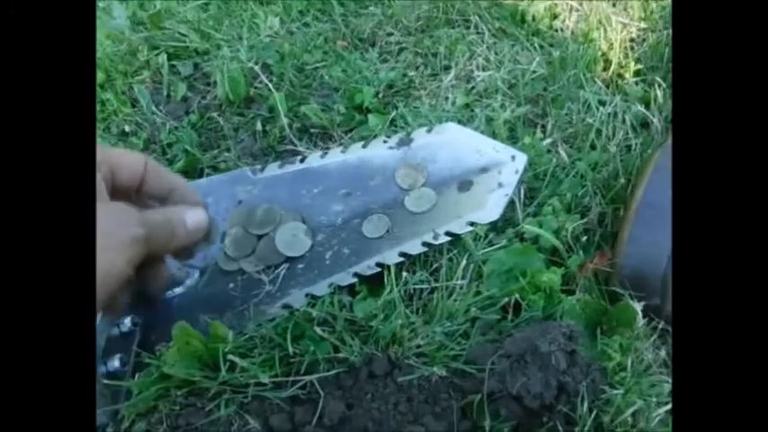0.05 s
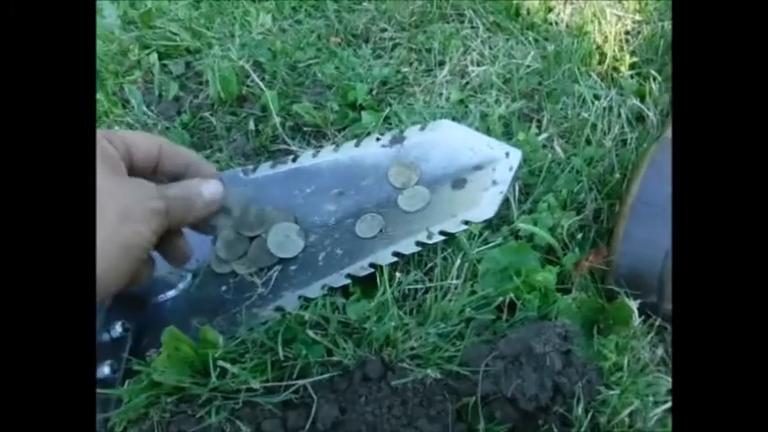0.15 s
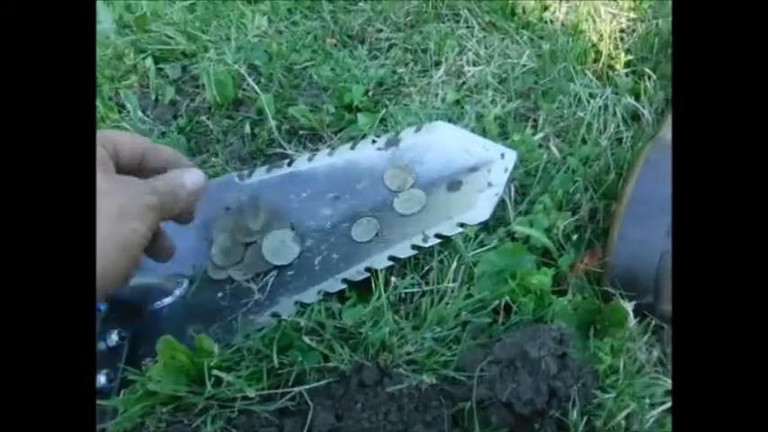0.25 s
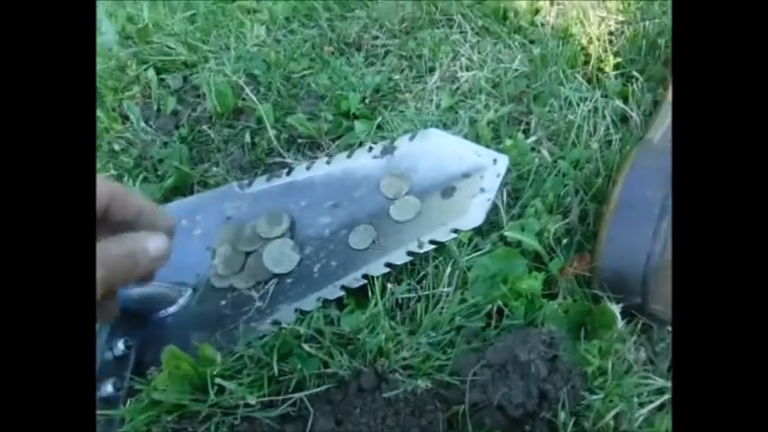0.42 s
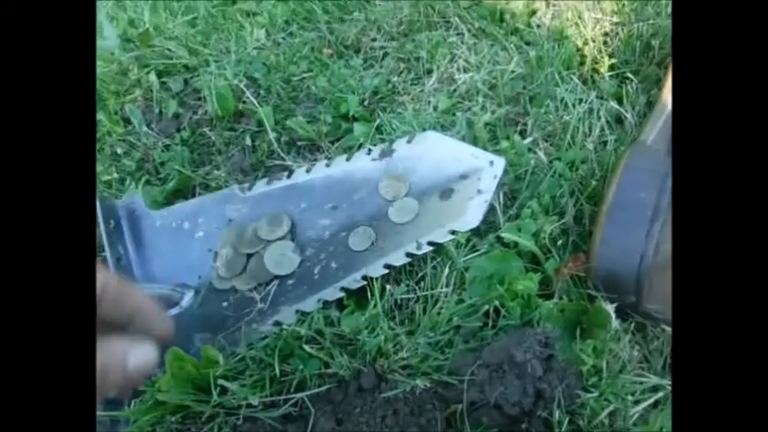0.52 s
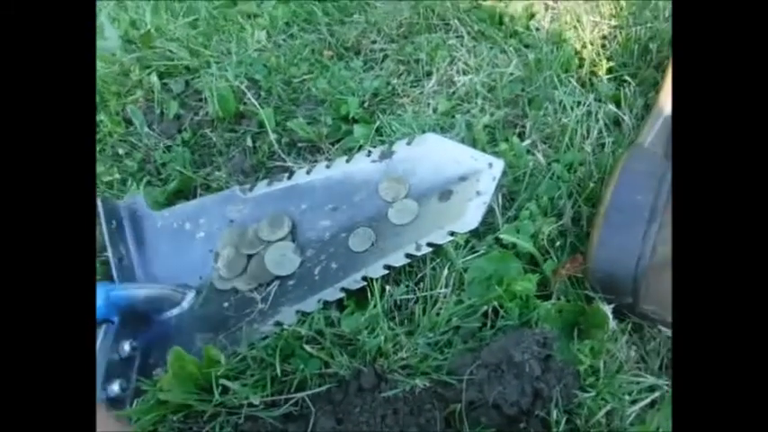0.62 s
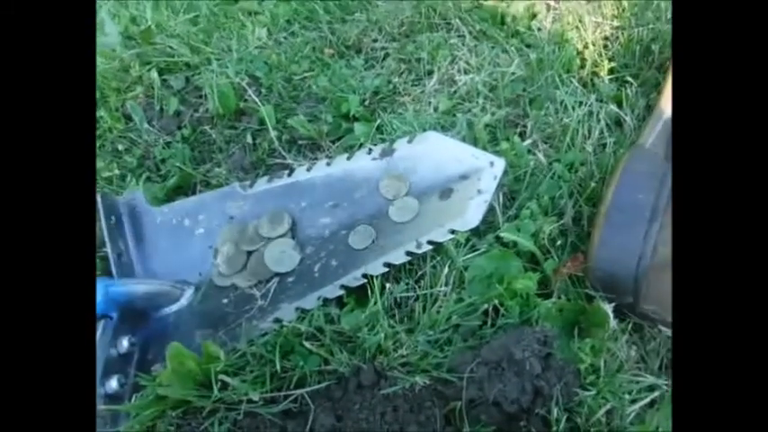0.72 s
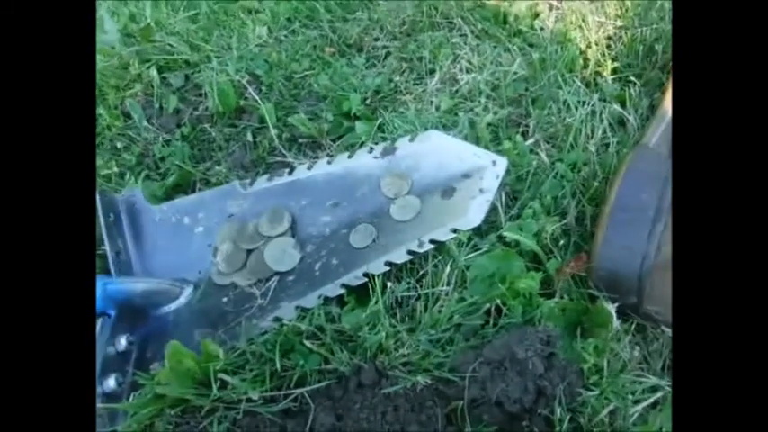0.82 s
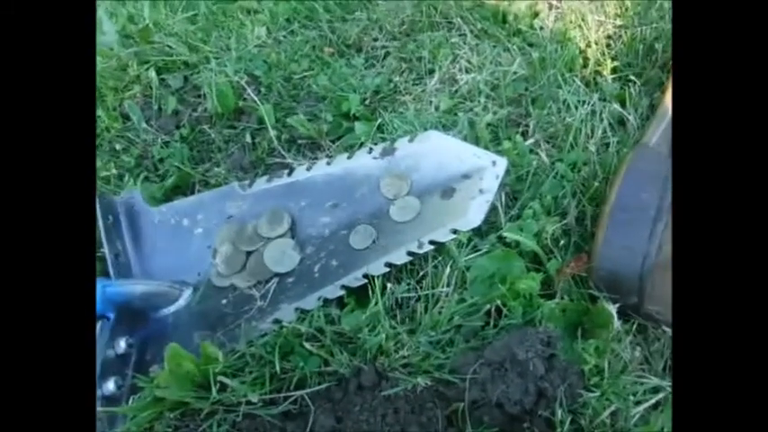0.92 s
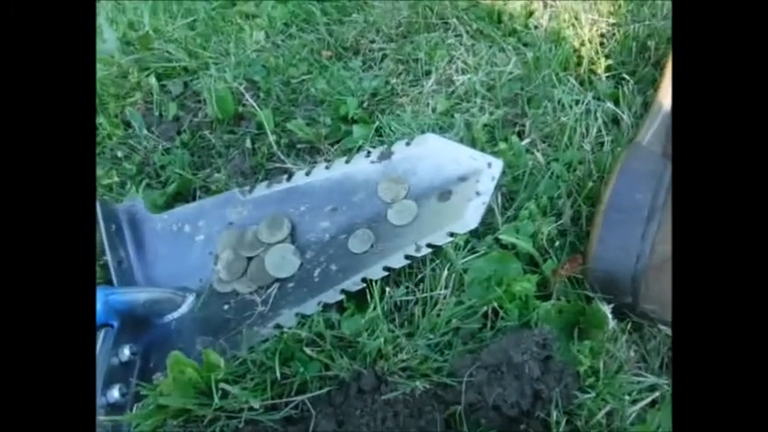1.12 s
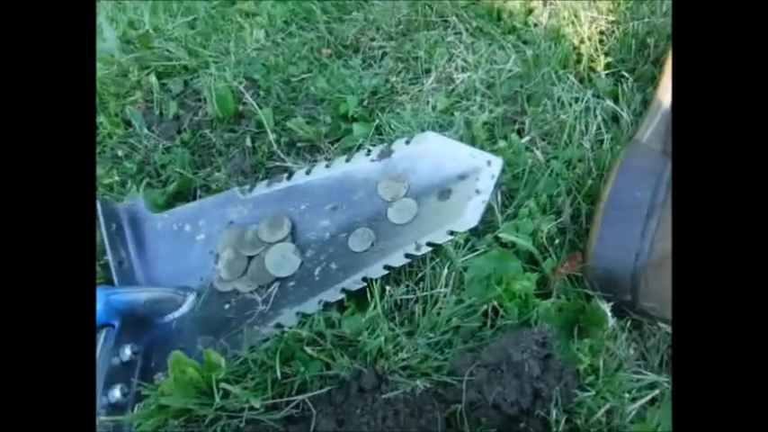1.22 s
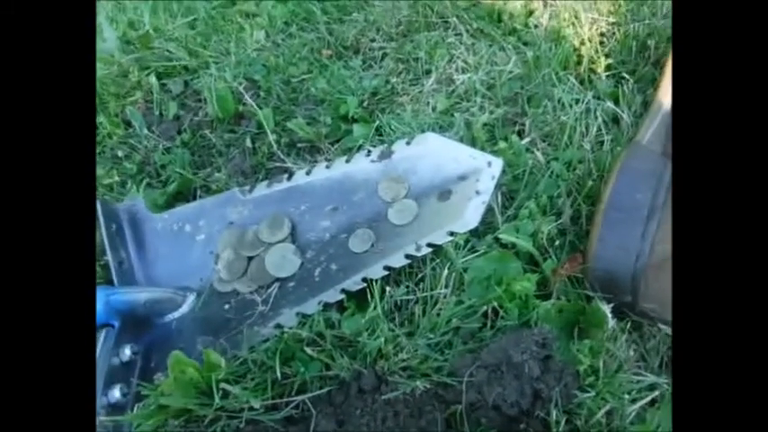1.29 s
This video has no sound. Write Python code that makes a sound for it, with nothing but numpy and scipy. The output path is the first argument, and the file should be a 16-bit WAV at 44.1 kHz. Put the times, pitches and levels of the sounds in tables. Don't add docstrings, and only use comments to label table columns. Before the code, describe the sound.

Two quick, bright clanks of coins landing on a metal blade outdoors, then quiet birdsong and distant traffic

```python
import sys
import numpy as np
from scipy import signal
from scipy.fft import rfft, irfft
from scipy.io import wavfile
from scipy.ndimage import uniform_filter1d

SR = 44100
rng = np.random.default_rng(int(sys.argv[2]) if len(sys.argv) > 2 else 0)


def wav_record(signal):
    frames = np.transpose(np.atleast_2d(signal))
    bounded = np.clip(frames, -1, 1)
    quanta = np.round(bounded * 32767).astype(np.int16)
    wavfile.write(sys.argv[1], SR, quanta)


def makeup_ratio(level_db):
    decades = np.asarray(level_db, float) / 20
    return 10 ** decades


N = 59535

FIRST_PITCHES = [1058, 1780, 3052, 3632, 4290, 4670, 4955, 5142, 5534, 5844, 8610, 8987, 9860, 10858]
BOUNCE_PITCHES = [1790, 3039, 3642, 4164, 4305, 4692, 5150, 5970, 8632]
SECOND_PITCHES = [980, 3060, 3583, 4140, 4685, 5128, 5240, 5715, 6264, 7106, 7960, 9755, 10309, 15400]
AFTER_PITCHES = [1055, 1717, 2093, 3402, 4313, 4856, 5290, 5650, 6000, 6621, 7540, 7873, 8050]
# (level [dB], time to fade by 60 dB [s])
FIRST_TONES = [(-21.5, 0.1), (-15, 0.033), (-10.5, 0.021), (-7.5, 0.034), (-2, 0.033), (0.5, 0.026),
               (-6.5, .06), (-1.5, 0.029), (-13, 0.05), (-1, 0.016), (-16, 0.14), (-7.5, 0.095),
               (-25.5, 0.046), (-23, .04)]
BOUNCE_TONES = [(-10, 0.044), (-8.5, .03), (-17.5, 0.077), (1.5, 0.028), (-18, 0.077), (-8, 0.028),
                (-10.5, 0.053), (-12, 0.027), (-8, 0.042)]
SECOND_TONES = [(-18.5, 0.037), (-10.5, 0.028), (-25, 0.023), (1.5, 0.036), (-32, 0.044), (-7, 0.061),
                (-9, 0.039), (-4.5, 0.031), (-1.5, 0.024), (-17, 0.025), (-14, 0.041), (-14, 0.049),
                (-24, .03), (-28, 0.043)]
AFTER_TONES = [(-29.5, 0.17), (-22, .12), (-27.5, 0.27), (-20, 0.17), (-32.5, 0.36), (-28, .25),
               (-34, 0.22), (-30, .25), (-25, 0.27), (-31, 0.16), (-35, .08), (-22, 0.18), (-19.5, 0.2)]
# (time [s], ring [dB], crack [dB], clatter [dB], brightness [dB per octave])
FIRST_HITS = [
    (0.241, -5, 6, -12.5, 8.5),
    (.2455, -22.5, -12, -25, -4.5),
    (0.2659, -30, -39, -48, 3),
]
BOUNCE_HITS = [
    (.2779, -17, -12, -41, -11),
    (.2882, -33.5, -21, -29, -2),
    (.3703, -25, -14, -28, 0),
    (.3270, -13, -15, -44, -11),
]
SECOND_HITS = [
    (0.3229, -53, -12, -45, -3),
    (0.3254, -43, 4.5, -32, 8),
    (0.3313, 4, -2, -5.5, 3.5),
    (0.34, -15.5, -12, -27, -4),
    (.3652, -39, -12, -42, 5),
    (.388, -41, -34, -48, 0),
]
# (frequency [Hz], level [dB])
CRACK_SPECTRUM = [(150, -31), (800, -16), (2400, -12.5), (4500, 3), (7000, -4), (10000, -4), (13000, -27.5),
                  (15500, -24)]
SINGING_PITCHES = [8856, 9314, 14620, 11680, 15400, 9120, 9321, 9082]
# (start [s], landing [s])
SINGING_TIMES = [(.2406, .293), (.2406, .33), (.2406, .27), (.2406, .27), (.2406, .25), (.3256, .331),
                 (.3312, .3648), (.3312, .63)]
# (level [dB], 60 dB fade in the air [s], 60 dB fade once landed [s])
SINGING_FADES = [(-17, 0.063, .1), (-34.5, 1.1, .1), (-37, 0.11, 0.1), (-26, 0.088, 0.11), (-23, .06, .06),
                 (-13, .1, .02), (-10, 1.4, 0.097), (-24.5, 0.45, .1)]
# (time [s], level [dB], pitch [Hz], 60 dB fade [s])
THUDS = [
    (0.336, -43, 92, 0.05),
    (1.183, -38, 81.4, 0.065),
]
# (time [s], level [dB])
SNAP = (1.295, -39)
# (start [s], length [s], first pitch [Hz], last pitch [Hz], level [dB])
CHIPS = [(.504, 0.017, 6700, 3800, -44), (.622, 0.022, 6200, 4330, -44), (.625, 0.038, 2950, 2960, -50),
         (.762, .010, 5980, 4600, -39.5), (.884, 0.0068, 6240, 5750, -56), (.916, 0.013, 6660, 5730, -49),
         (1.158, .009, 8360, 7140, -47.5), (1.178, .014, 6220, 5000, -50), (.005, 0.021, 2188, 2015, -48),
         (.04, 0.043, 2235, 2030, -53), (.035, 0.06, 3005, 2790, -52.5), (.075, .05, 5300, 4240, -52),
         (.826, 0.043, 3900, 4526, -42.5), (.830, .026, 4720, 5000, -43.5), (.672, .03, 4200, 4480, -43.5),
         (.682, 0.022, 4800, 4880, -45)]
CHIRRUPS = [
    (.698, 0.039, 4020, 3137, -44),
    (.852, .056, 4075, 2713, -43.5),
    (1.01, 0.032, 4600, 5170, -47.5),
    (1.06, 0.026, 5400, 4720, -45.5),
]
# (multiple of idling pitch [-], level [dB])
ENGINE_TONES = [(1, -77), (2, -59.5), (3, -62.5), (4, -61), (6, -66), (8, -70)]
# (time [s], level [dB])
ENGINE_LOAD = [(0, 0), (.3, 0.5), (.55, -3.5), (.8, 1), (1.05, 3), (1.35, 4.5)]
# (frequency [Hz], level [dB per Hz])
WASH_SPECTRUM = [(15, -42), (30, -20), (90, -3.5), (350, -13.5), (1500, -5), (2500, -9.5), (4400, -4.5),
                 (9000, -13), (15500, -23.5)]
# (time [s], length [s], lost above [Hz])
DROPOUTS = [(.538, .02, 7200), (.624, .014, 9300), (.804, .036, 9300), (.944, .016, 8500),
            (1.028, .018, 9300), (1.328, .018, 8800)]

WASH_DB = -47.5


def evened(x):
    return x / np.sqrt(np.mean(x ** 2) + 1e-20)


def read(points, hz):
    f, value = np.transpose(points)
    return np.interp(np.log(hz + 1), np.log(f + 1), value)


def add(mix, s, sound):
    part = mix[round(s * SR):][:len(sound)]
    part += sound[:len(part)]


def coloured(db_of_hz, size):
    spectrum = rfft(rng.standard_normal(size))
    hz = np.fft.rfftfreq(size, 1 / SR)
    return evened(irfft(spectrum * makeup_ratio(db_of_hz(hz)), size))


def wander(per_s, size):
    drift = rng.standard_normal(size + SR)
    for _ in range(2):
        drift = signal.lfilter([1], [1, -np.exp(-per_s / SR)], drift)
    return evened(drift[SR:])


def half_second():
    return np.arange(SR // 2) / SR


def ring(pitches, tones):
    t = half_second()
    db, t60 = np.transpose(tones)[:, :, None]
    turns = np.outer(pitches, t) + rng.random((len(pitches), 1))
    fade = makeup_ratio(db - 60 * t / np.clip(t60, .005, .4))
    rise = np.minimum(t / 0.00033, 1)
    return rise * (fade * np.sin(2 * np.pi * turns)).sum(0)


def impact_noise(tilt_db):
    def spectrum(hz):
        return read(CRACK_SPECTRUM, hz) + tilt_db * np.log2(np.maximum(hz, 2500) / 5000)
    return coloured(spectrum, size=SR // 2)


def contact(ringing, ring_db, crack_db, clatter_db, tilt_db):
    t = half_second()
    crack_t60, clatter_t60 = .004, 0.054
    crack = makeup_ratio(crack_db - 60 * t / crack_t60) * impact_noise(tilt_db)
    clatter = makeup_ratio(clatter_db - 60 * t / clatter_t60) * impact_noise(tilt_db - 3.5)
    rise = np.minimum(t / 0.00024, 1)
    return makeup_ratio(ring_db) * ringing + rise * (crack + clatter)


def landings():
    out = np.zeros(N)
    for pitches, tones, hits in [(FIRST_PITCHES, FIRST_TONES, FIRST_HITS),
                                 (BOUNCE_PITCHES, BOUNCE_TONES, BOUNCE_HITS),
                                 (SECOND_PITCHES, SECOND_TONES, SECOND_HITS)]:
        for s, *how in hits:
            add(out, s, contact(ring(pitches, tones), *how))
    loudest_s = SECOND_HITS[2][0]
    add(out, loudest_s, makeup_ratio(-5) * ring(AFTER_PITCHES, AFTER_TONES))
    return out


def singing():
    out, t = np.zeros(N), half_second()
    rise = 1 - np.exp(-t / 0.0042)
    landing_db = -2
    for hz, (s, lands), (db, t60, landed_t60) in zip(SINGING_PITCHES, SINGING_TIMES, SINGING_FADES):
        landed = np.maximum(t - (lands - s), 0)
        fade_db = -60 * (t - landed) / t60 - 60 * landed / landed_t60
        fade_db = fade_db + landing_db * np.minimum(landed / 0.0015, 1)
        add(out, s, rise * makeup_ratio(db + fade_db) * np.sin(2 * np.pi * hz * t))
    return out


def coins():
    bass_cut_hz = 760
    return signal.lfilter(*signal.butter(2, bass_cut_hz, "high", fs=SR), landings() + singing())


def ground():
    out, t = np.zeros(N), half_second()
    for s, db, hz, t60 in THUDS:
        add(out, s, makeup_ratio(db - 60 * t / t60) * np.sin(2 * np.pi * hz * t))
    snap_s, snap_db = SNAP
    noise = coloured(lambda hz: 5.4 * np.log2(hz + 50), size=len(t))
    add(out, snap_s, makeup_ratio(snap_db - 60 * t / .006) * noise)
    return out


def sparrows():
    out = np.zeros(N)
    buzz_hz, buzz_depth = 297.4, 0.8
    for notes, depth in [(CHIPS, 0), (CHIRRUPS, buzz_depth)]:
        for s, length, from_hz, to_hz, db in notes:
            t = np.arange(0, length, 1 / SR)
            turns = np.cumsum(from_hz + (to_hz - from_hz) * t / length) / SR
            buzz = depth * np.sin(2 * np.pi * buzz_hz * t)
            swell = np.sin(np.pi * t / length)
            add(out, s, makeup_ratio(db) * swell * np.sin(2 * np.pi * turns + buzz))
    hoarseness = evened(uniform_filter1d(rng.standard_normal(N), size=60))
    out = out * (1 + 0.56 * hoarseness)
    t = np.arange(SR // 4) / SR
    echo_db, echo_t60 = -4, .12
    echo = rng.standard_normal(len(t)) * makeup_ratio(-60 * t / echo_t60) * (t > .004)
    echo = echo / np.linalg.norm(echo)
    return out + makeup_ratio(echo_db) * signal.fftconvolve(out, echo)[:N]


def engine():
    idle_hz = 40.8
    turns = np.cumsum(idle_hz * (1 + 0.0064 * wander(per_s=12.6, size=N))) / SR
    hum = np.zeros(N)
    for multiple, db in ENGINE_TONES:
        level = makeup_ratio(db + 3.1 * wander(per_s=28, size=N))
        hum += level * np.sin(2 * np.pi * (round(multiple) * turns + rng.random()))
    load_db = np.interp(np.arange(N) / SR, *np.transpose(ENGINE_LOAD))
    return makeup_ratio(load_db - 3) * hum


def leaves():
    centre_hz, width_hz, level_db = 4800, 1200, -41.5
    frames, hz = N // 128 + 6, np.fft.rfftfreq(512, 1 / SR)
    a, b, patches = rng.standard_normal((frames, 257, 3)).T
    patches = uniform_filter1d(patches, size=8, axis=0)
    patches = evened(uniform_filter1d(patches, size=10, axis=1))
    band = makeup_ratio(level_db - 9.8 * ((hz - centre_hz) / width_hz) ** 2)[:, None]
    flicker = (a + 1j * b) * band * makeup_ratio(3.0 * patches)
    return signal.istft(flicker, nperseg=512, noverlap=384)[1][:N] / 16


def wash():
    noise = coloured(lambda hz: read(WASH_SPECTRUM, hz), size=N)
    return makeup_ratio(WASH_DB + 0.98 * wander(per_s=26, size=N)) * noise


def scene():
    return (coins() + ground() + sparrows() + engine() + leaves() + wash())[None]


def overload(x):
    ceiling, knee = 0.84, 5.7
    return x / (1 + abs(x / ceiling) ** knee) ** (1 / knee)


def dropouts(x):
    hz, t, z = signal.stft(x, SR, nperseg=512, noverlap=384)
    lost = 0
    for s, length, top_hz in DROPOUTS:
        chance = rng.random(len(hz))[np.arange(len(hz)) // 2]
        gone = (hz > top_hz) | ((chance < .3) & (hz > 200))
        lost = lost + gone[:, None] * np.exp(-((t - s) / (length / 2)) ** 4)
    lost_db, edge_hz = -24, 15750
    edge_db = -55 * np.clip((hz[:, None] - edge_hz) / 300, 0, 1)
    return signal.istft(z * makeup_ratio(lost_db * lost + edge_db), SR, nperseg=512, noverlap=384)[1][:, :N]


def top_cut(x):
    return signal.sosfilt(signal.butter(12, 16670, fs=SR, output="sos"), x)


def record(dry):
    mix = dropouts(overload(dry))
    return top_cut(mix)


dry = scene()
out = record(dry)
wav_record(out)
```